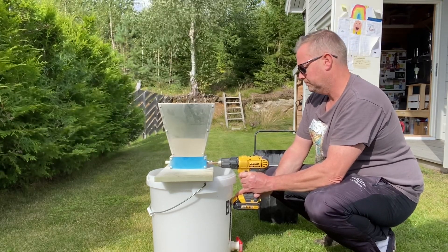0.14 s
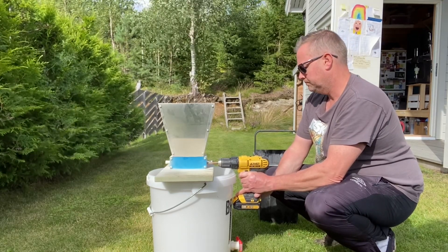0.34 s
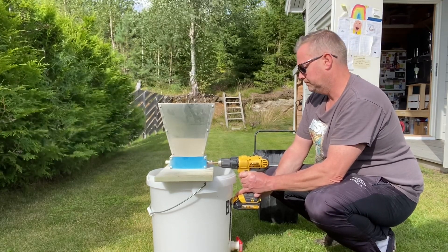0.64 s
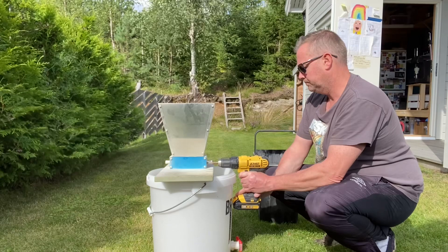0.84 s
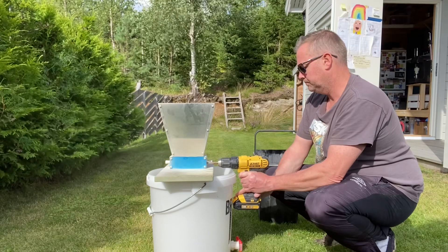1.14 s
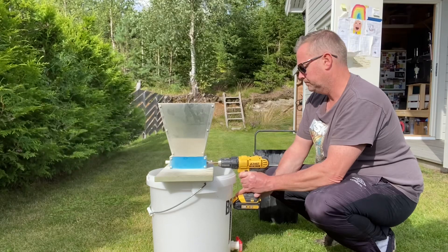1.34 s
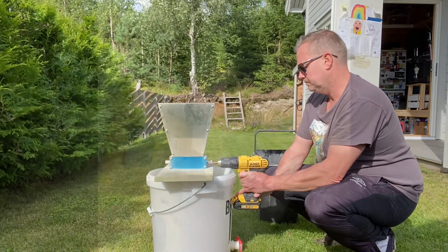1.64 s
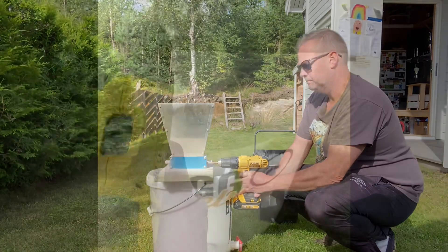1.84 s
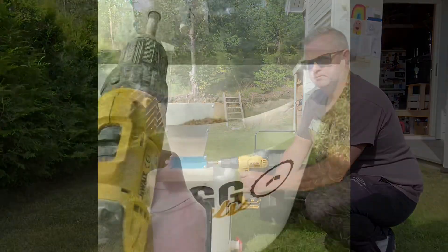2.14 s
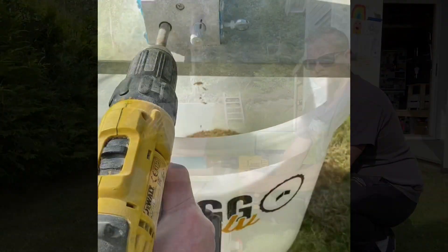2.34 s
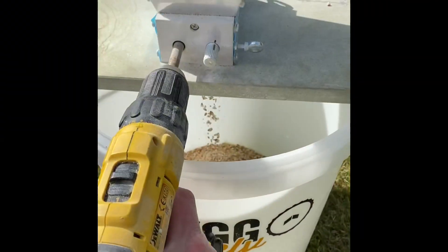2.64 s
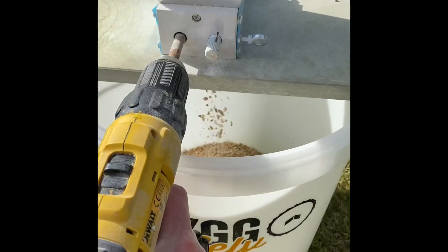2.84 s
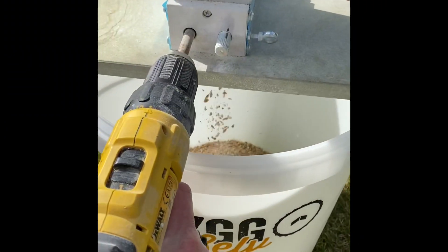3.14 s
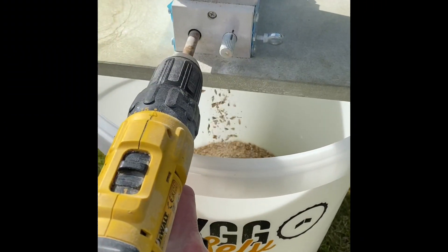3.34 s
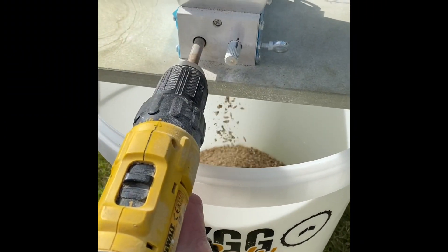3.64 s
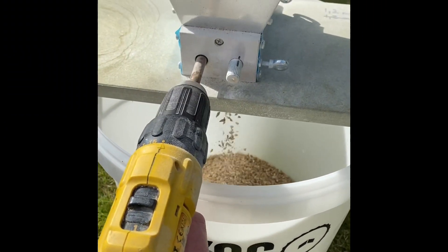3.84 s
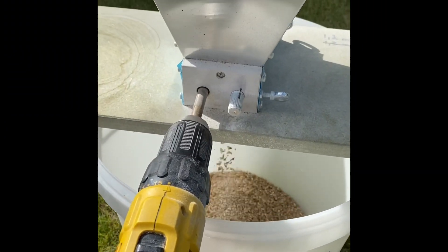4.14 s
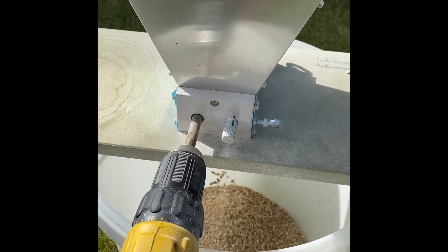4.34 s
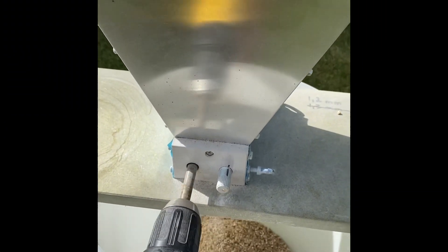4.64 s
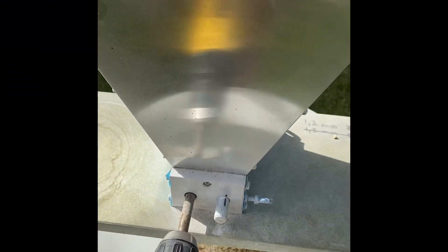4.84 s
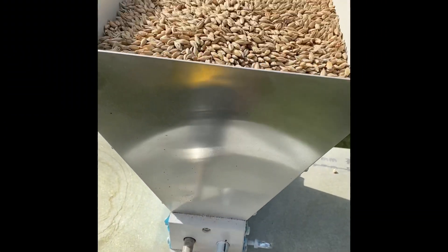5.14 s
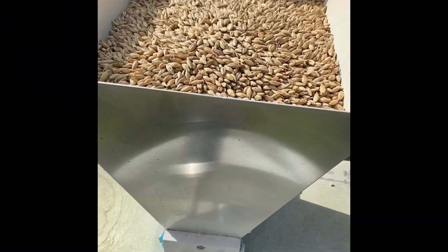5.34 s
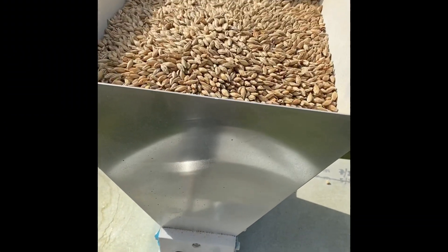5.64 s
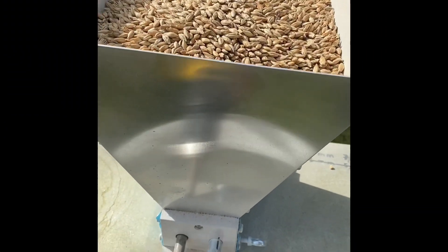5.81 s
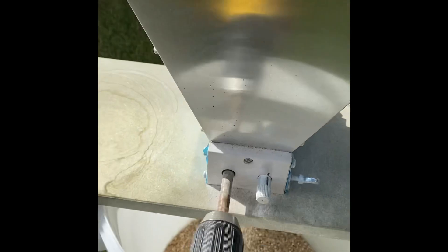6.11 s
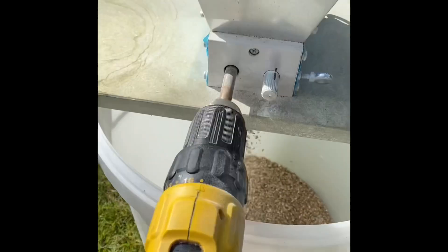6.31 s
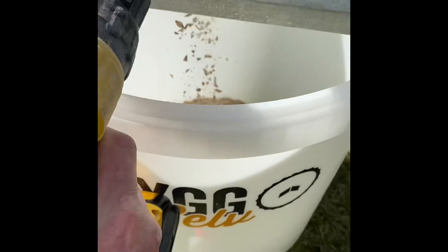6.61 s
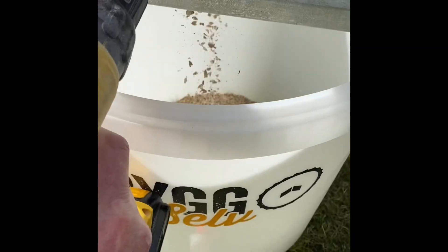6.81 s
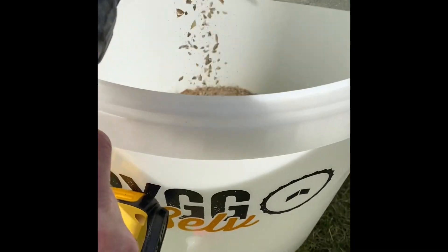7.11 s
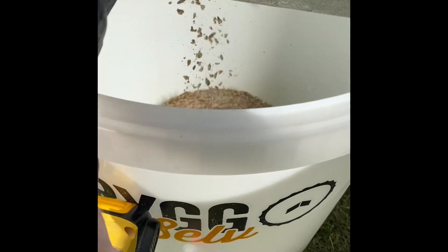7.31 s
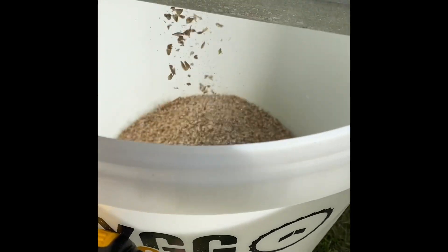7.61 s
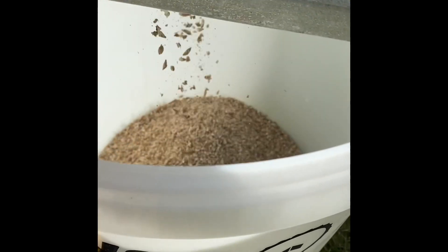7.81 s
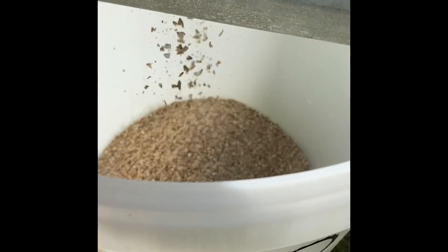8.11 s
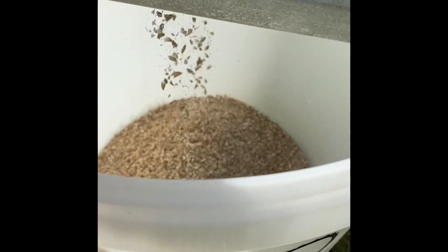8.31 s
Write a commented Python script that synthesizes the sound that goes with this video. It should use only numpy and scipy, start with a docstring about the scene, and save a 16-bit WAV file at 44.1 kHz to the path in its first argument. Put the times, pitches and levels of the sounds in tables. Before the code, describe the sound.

A cordless drill turns a grain mill outdoors, first distant under buffeting wind, then close and loud with piercing whine, gritty crunching and sagging gears.

```python
"""A cordless drill turns the rollers of a malt mill on a board over a plastic bucket, on a lawn.
At first the mill is heard from a few steps away as one ringing body, with gusts on the microphone.
A cross-fade leads to a close microphone: the rollers nudge the grain, falter, bite and get going.
The chopped motor current whines at a fixed pitch, gears sing and sag under clumps, kernels fracture into resonances.
The microphone moves from drill to board to hopper, with a soft thump on the way, then back down to the bucket."""
import sys
import numpy as np
from scipy import signal
from scipy.fft import rfft, irfft, next_fast_len
from scipy.io import wavfile
from scipy.ndimage import uniform_filter1d

SR = 44100
rng = np.random.default_rng(int(sys.argv[2]) if len(sys.argv) > 2 else 0)


def persist_wave(psi):
    """Save psi, clipped to +-1, as 16-bit WAV."""
    counts = np.round(np.clip(psi, -1, 1) * 32767).astype(np.int16)
    wavfile.write(sys.argv[1], SR, np.atleast_2d(counts).T)


N = 373086

# wind gusts: (start [s], length [s], rumble level [dB], flapping against the rumble [dB])
GUSTS = [(0, 1.4, -38.5, -21), (0.01, 0.18, -28, -2.5), (0.04, 0.015, -27, -6), (0.222, 0.023, -30.5, -22),
         (0.337, 0.032, -32.5, -16), (0.477, 0.042, -28, -4), (0.557, 0.066, -30, -5),
         (0.657, 0.016, -28.5, -3), (0.72, 0.036, -37, -18), (0.815, 0.02, -35, -13),
         (0.873, 0.062, -31, -24), (1.01, 0.093, -35.5, -25), (1.169, 0.03, -29.5, -14),
         (1.306, 0.064, -33.5, -7), (1.415, 0.14, -36.5, -9), (4.06, .25, -40, -13),
         (5.147, 0.72, -42.5, -25), (5.867, 0.49, -39.5, -23)]
# spectrum of the wind's rumble: (frequency [Hz], level [dB per Hz])
RUMBLE_SPECTRUM = [(15, -48), (35, -8), (60, 4), (110, 0), (200, -8), (350, -23.5), (700, -48.5),
                   (2000, -87.5)]
GUST_EDGE_S = 0.01
# floor under the gusts: the breeze fades with the distant view, the lull stays
BREEZE_DB, LULL_DB = -47, -51.5

# likeness of left and right: (frequency [Hz], likeness [0-1], lead of the left [rad]); from 8.2 to 11.6 kHz
# left and right are exact opposites
NEAR_PORTS = [(100, .92, 0), (400, .85, 0), (620, .8, -.9), (800, .8, -1.2), (1150, .75, 1.5),
              (1450, .85, .6), (1800, .85, .4), (2700, .8, 1.4), (3500, .85, .9), (4900, .8, 2.0),
              (5700, .8, 1.6), (7200, .9, 2.6), (8200, 1, 3.14), (11600, 1, 3.14), (14000, .65, 3.7)]
FAR_PORTS = [(200, .7, 0), (600, .88, 0), (1300, .97, -.2), (2000, .85, -.9), (3900, .8, -2.2),
             (6000, .7, -4), (7500, .97, -6.2), (10500, .95, -6.4), (14000, .7, -8.5)]
NEAR_LAG_MS = 0.05   # right port behind the left
# path of the close microphone: (time [s], place [0 hopper, 1 board, 2 drill, 3 bucket])
PATH = [(2.5, 2), (3.55, 1.94), (4.2, 1.41), (4.7, 0.53), (5.1, 0.047), (5.75, 0.043), (6.2, 1.22),
        (6.55, 2.18), (7.25, 3.12), (8.46, 3.17)]

# the distant view: crushing level, whine at left and right port, lead of the left whine, fade-out
FAR_DB, FAR_WHINE_DB, FAR_WHINE_LEAD_RAD = -33.5, (-37, -39.5), -2.08
FADE_START_S, FADE_END_S = 1.604, 2.53
# resonances of the distant mill as one body: (frequency [Hz], width [Hz], level [dB])
FAR_MODES = [(192, 91, -6.5), (475, 71, 3), (621, 22.6, 6), (683, 63, 0.5), (813, 66, 0.5),
             (1220, 405, -4.5), (1403, 43, 5), (1840, 235, -6), (2032, 13, 0.5), (2270, 120, -7.5)]
# hiss spectra of husks, far and near: (frequency [Hz], level [dB per Hz])
FAR_HUSKS_SPECTRUM = [(1500, -15), (2700, 0), (3500, -1), (4100, 4), (4400, -3), (5050, 4), (6500, -4),
                      (7400, 1), (8300, 2), (9500, -6), (11000, -9), (13000, -7), (14500, -5), (16000, -12)]
HUSKS_SPECTRUM = [(2500, -20), (3600, -5), (4300, 1), (5200, 1), (6100, -3.5), (7100, -1.5), (8600, -1),
                  (10000, -5), (12000, -7.5), (14700, -7), (16000, -19)]

# resonances of bucket walls, bucket air at the rim, board, hopper walls, hopper mouth and grist:
# (frequency [Hz], width [Hz], level [dB])
BUCKET_MODES = [(58.5, 36, -3.5), (96, 27, -0.5), (158.4, 22, 2.5), (288, 58, -2)]
BUCKET_AIR_MODES = [(86.5, 46, -4), (150, 15, 7.5), (430, 130, -12), (548, 57, 1)]
BOARD_MODES = [(384, 99, -12), (519, 38, -4), (627.4, 31.4, 4.5), (699.5, 53, -0.5), (799, 72, -3)]
HOPPER_MODES = [(1111, 280, 1), (1368, 250, 2.5), (1686, 387, -0.5), (2388, 300, 3), (2810, 570, -1),
                (3680, 450, -6.5)]
MOUTH_MODES = [(809, 160, 1.5), (1042, 37, -2.5), (1113, 101, 0.5), (1597, 160, -2.5)]
GRIST_MODES = [(8400, 1100, 0)]
# base level of each crushed part at four places: (hopper [dB], board [dB], drill [dB], bucket [dB])
BUCKET_DB = (-43.5, -42, -36.5, -40.5)
BUCKET_AIR_DB = (-47.5, -52, -48, -35)
BOARD_DB = (-34.5, -32.5, -32, -32)
HOPPER_DB = (-34, -35.5, -30, -29)
HUSKS_DB = (-37, -35.5, -32, -26.5)
GRIST_DB = (-63, -66, -61, -35.5)
# the board's two highest modes against the others, at the same places [dB]
BOARD_TOP_DB = (1, 0.95, 0.66, -2.5)
# the hopper's mouth against its walls, at the same places [dB]
MOUTH_DB = (-0.5, 1.5, -7, -32.5)
# basic left-right difference of board and hopper, at the same places [dB]
PAN_DB = (-2.5, -3.5, -3.5, -3)
# the rollers nudge the grain once, then bite and get going
NUDGE_AT_S, NUDGE_WIDTH_S, NUDGE_DB = 2.263, 0.086, -12.5
BITE_AT_S, BITE_RISE_S = 2.384, 0.17
LOAD_DB_PER_HZ = -0.012   # crushing grows softer as the drill sags
# hard kernels bursting: (time [s], peak before the ports [dB], low-pass corner [Hz], decay time [s])
SNAPS = [(2.225, -28, 2970, 0.016), (2.653, -24.5, 700, 0.009), (2.852, -25, 598, 0.0037),
         (2.999, -16.5, 8000, 0.0033), (3.021, -19, 5000, .002), (3.787, -18, 1000, .008),
         (3.822, -18, 2397, 0.0055), (3.925, -11.5, 12000, 0.0061), (4.534, -22.5, 800, 0.0044),
         (4.622, -25, 911, 0.015), (4.751, -22, 800, 0.0082), (5.236, -23.5, 704, 0.0078),
         (5.332, -17.5, 3000, 0.01), (5.567, -22.5, 2400, 0.006), (5.585, -22.5, 250, 0.0043),
         (6.258, -25, 600, 0.0031), (6.603, -9, 5970, 0.0033), (7.585, -17, 600, 0.0046),
         (7.865, -17.5, 600, .007)]

# close switching whine: (time [s], left base level [dB], right base level [dB], lead of the left [rad])
WHINE = [(2.062, -70, -70, 6), (2.075, -40, -31.5, 2.5), (2.21, -29.5, -27.5, 0.5), (2.34, -33.5, -30, 1),
         (2.47, -25.5, -23, 0.3), (2.75, -28.5, -22.5, 0), (3.57, -28, -20, 0.9), (3.9, -32.5, -26.5, -2),
         (4.27, -24.5, -33, -3.5), (4.62, -27, -25, -4), (5.05, -27, -22, -4), (5.5, -28.5, -30.5, -4.5),
         (6.03, -29.5, -26, -4.5), (6.19, -25, -28, -3), (6.39, -23, -17, -5), (6.62, -23.5, -25, -6),
         (6.98, -24, -22.5, -5.5), (7.13, -27, -26.5, -6), (7.8, -24.5, -29, -6), (8.46, -23.5, -25.5, -6)]
# nodes of the whine's standing waves that the microphone crosses:
# (time [s], half width [s], left loss [dB], right loss [dB])
NODES = [(3.73, 0.041, 8, 2.5), (4.109, 0.063, 9, 30), (4.84, 0.089, 3.5, 6), (6.08, 0.038, 9, 12),
         (6.3, 0.026, 11, 15), (6.35, 0.032, 17, -1)]

# drill speed apart from jams, with a faltering spin-up: (time [s], gear mesh rate [Hz])
CRUISE = [(0, 1364), (2.37, 1368), (2.4, 850), (2.515, 1085), (2.555, 1015), (2.62, 1147), (2.7, 1250),
          (2.74, 1345.0), (2.79, 1393), (3.3, 1520.0), (3.55, 1517), (3.8, 1444.0), (4.4, 1422),
          (4.58, 1323.0), (4.66, 1438), (4.8, 1466), (5.03, 1248), (5.38, 1460), (5.72, 1296),
          (5.93, 1450.0), (6.1, 1463), (6.25, 1362), (6.78, 1447.0), (7.05, 1414), (7.43, 1468),
          (7.59, 1367.0), (7.68, 1455), (8.04, 1494), (8.14, 1421), (8.46, 1392)]
# tough clumps: (end of slowing [s], sag of the mesh rate [Hz], slowing time [s], recovery time [s])
JAMS = [(3.03, 167.9, 0.047, 0.088), (3.115, 102.0, 0.037, 0.097), (3.35, 141.1, 0.043, 0.2),
        (3.62, 142.9, 0.088, 0.077), (3.82, 138.8, 0.14, 0.18), (4.05, 55.02, 0.096, 0.035),
        (4.19, 130.0, 0.064, 0.092), (4.73, 70.0, 0.036, 0.03), (4.87, 91.25, 0.057, 0.032),
        (5.25, 72.88, 0.053, 0.18), (5.46, 102.1, 0.089, 0.051), (5.98, 55.95, 0.032, 0.032),
        (6.14, 94.9, 0.042, 0.068), (6.575, 175.6, 0.051, 0.043), (6.82, 53.13, 0.021, 0.062),
        (7.05, 119.3, 0.044, 0.085), (7.31, 78.4, 0.026, 0.059), (7.465, 89.2, 0.029, 0.088),
        (7.71, 45.94, 0.027, 0.058), (7.91, 55.2, 0.043, 0.021), (8.35, 279.6, 0.031, 0.031)]
# mesh-rate slowing at which braking counts as full, and the rattle it adds to the third harmonic
HARD_BRAKE_HZ_PER_S, BRAKE_RATTLE_DB = 1200, 6.5
# resonances and hollows of the gear case: (frequency [Hz], half width [Hz], level [dB])
CASE = [(1110, 180, -11), (1430, 120, 6), (3670, 250, 2.5), (4023, 190, 7), (5700, 780, -8),
        (7100, 770, -4)]
# directional resonances of the case:
# (frequency [Hz], half width [Hz], hopper [dB], board [dB], drill [dB], bucket [dB])
BEAMS = [(2510, 44, 4, 4, 14.5, 1.5), (2885, 60, 4, 10.5, -1.5, 1.5)]
# base level of each gear partial at four places: (hopper [dB], board [dB], drill [dB], bucket [dB])
ROTOR_DB = (-48.5, -50.5, -48.5, -40.5)
MESH_DB = (-68.5, -43, -37, -39)
SECOND_DB = (-44, -49.5, -40, -32)
THIRD_DB = (-63, -53, -38, -38)
FOURTH_DB = (-61, -52.5, -38.5, -35)
FIFTH_DB = (-46, -39.5, -38.5, -39)
PLANET_SHARE = .08   # sidebands lie this share of the mesh rate below each partial
MESH_SIDEBAND_DB, HARMONIC_SIDEBAND_DB = -6.5, -12
FILLED_AT_S, EMPTY_PLAY = 2.95, .6   # gears run cleaner until the rollers have filled with grain
STALL_SAG_HZ, STALL_LOSS_DB = 220, 9   # close to a stall the gear tones weaken
CUTOFF_HZ = 15900


def from_db(db):
    """Logarithmic level law: decibels to amplitude gain."""
    return 10 ** (np.asarray(db) / 20)


def rms_one(x):
    """Normalisation to unit mean power."""
    return x / np.sqrt(np.mean(x ** 2) + 1e-20)


def clock():
    """Uniform sampling: time in seconds at every sample."""
    return np.arange(N) / SR


def bell(x, centre, width):
    """Gaussian hump of height 1, fallen to 1/e one width from its centre."""
    return np.exp(-np.minimum(((x - centre) / width) ** 2, 20))


def in_time(rows):
    """Linear interpolation of each column of a curve at every sample."""
    s, *columns = np.transpose(rows)
    return [np.interp(clock(), s, column) for column in columns]


def at_hz(points, hz):
    """Interpolation of a table on a logarithmic frequency axis."""
    f, value = np.transpose(points)
    return np.interp(np.log(hz + 1), np.log(f), value)


def filtered(x, response):
    """Linear filtering: the spectrum is multiplied by a response given against frequency."""
    size = next_fast_len(N + 4096)
    hz = np.arange(size // 2 + 1) * SR / size
    return irfft(rfft(x, size) * response(hz), size)[..., :N]


def coloured(x, spectrum):
    """Spectral shaping of a sound; rms 1."""
    return rms_one(filtered(x, lambda hz: from_db(at_hz(spectrum, hz))))


def drift(rate):
    """Low-passed random fluctuation of rms 1, slow below the given rate in Hz."""
    return rms_one(filtered(rng.standard_normal(N), lambda hz: 1 / (1 + (hz / rate) ** 2)))


def ring(x, modes):
    """Modal superposition: resonances in parallel, with alternating signs."""
    out = 0
    for k, (hz, width, db) in enumerate(modes):
        r = np.exp(-np.pi * width / SR)
        poles = [1, -2 * r * np.cos(2 * np.pi * hz / SR), r * r]
        mode = signal.lfilter([1, 0, -1], poles, x + 1e-18)
        out = out + (-1) ** k * from_db(db) * (1 - r * r) / 2 * mode
    return out


def band(x, low_hz, high_hz):
    """Band limitation; rms 1."""
    edges = [low_hz, min(high_hz, .45 * SR)]
    return rms_one(signal.sosfilt(signal.butter(2, edges, "band", fs=SR, output="sos"), x))


def panned(x, pan_db):
    """Intensity stereo: power shared between left and right."""
    gains = from_db(np.array([[.5], [-.5]]) * pan_db)
    return x * gains / np.sqrt(np.mean(gains ** 2, axis=0))


def ports(pair, table):
    """Partial coherence: two sounds become left and right, alike and shifted in phase by frequency."""
    likeness, lead = np.array(table)[:, [0, 1]], np.array(table)[:, [0, 2]]
    mid = filtered(pair[0], lambda hz: np.sqrt(1 + np.clip(at_hz(likeness, hz), -1, 1)))
    side = filtered(pair[1], lambda hz: np.sqrt(1 - np.clip(at_hz(likeness, hz), -1, 1)))
    right = filtered(mid - side, lambda hz: np.exp(-1j * at_hz(lead, hz)))
    return np.array([mid + side, right])


def heard(levels):
    """Dependence on position: a value given for each place, followed along the microphone's path."""
    place, = in_time(PATH)
    return np.interp(place, np.arange(len(levels)), levels)


def far_fade():
    """Linear amplitude fade-out of the distant view."""
    return np.clip((FADE_END_S - clock()) / (FADE_END_S - FADE_START_S), 0, 1)


def biting():
    """Exponential approach to full level as the close rollers bite and get going."""
    return 1 - np.exp(-np.maximum(clock() - BITE_AT_S, 0) / BITE_RISE_S)


def running():
    """Envelope of the close crushing: a Gaussian nudge, then the steady run."""
    return from_db(NUDGE_DB) * bell(clock(), NUDGE_AT_S, NUDGE_WIDTH_S) + biting()


def sag():
    """Load on a motor: each clump costs mesh rate (Hz) quickly, then speed recovers exponentially."""
    t = clock()[::20]
    lost = 0
    for s, hz, slowing_s, recovery_s in JAMS:
        slowing = np.clip(1 + (t - s) / slowing_s, 0, 1)
        recovery = np.exp(-np.clip((t - s) / recovery_s, 0, 20))
        lost = lost + hz * slowing * recovery
    return np.interp(clock(), t, lost)


def braking():
    """Deceleration: how hard a clump is slowing the drill, 0-1, smoothed over 20 ms."""
    slowing = np.gradient(sag()) * SR / HARD_BRAKE_HZ_PER_S
    return uniform_filter1d(np.clip(slowing, 0, 1), size=SR // 50)


def breeze(own=0.85, lumpy_db=1.0):
    """Turbulent pressure: gusts rumble partly alike on both ports and flap higher up on each apart."""
    t = clock()
    gusts = []
    for s, length_s, db, _ in GUSTS:
        inside_s = np.minimum(t - s, s + length_s - t)   # negative outside the gust
        gusts.append(from_db(db) * np.clip(1 + inside_s / GUST_EDGE_S, 0, 1))
    floor = from_db(BREEZE_DB) * far_fade() + from_db(LULL_DB)
    level = np.maximum(np.max(gusts, axis=0), floor)
    flaps = [gust * from_db(flap_db) for gust, (*_, flap_db) in zip(gusts, GUSTS)]
    eddies = rng.standard_normal(N) + own * rng.standard_normal((2, N))
    rumble = coloured(eddies * from_db(lumpy_db * drift(17)), RUMBLE_SPECTRUM)
    flapping = band(rng.standard_normal((2, N)), 150, 377)
    return level * rumble + np.max(flaps, axis=0) * flapping


def bump(at_s=4.092, peak_db=-17, push_s=0.011):
    """Impulse response: a short handling push on the microphone excites three bass resonances."""
    since = clock() - at_s
    push = np.clip(since / 0.0044, 0, 1) * np.exp(-np.maximum(since, 0) / push_s)
    modes = [(64.0, 22.0, -3.0), (111, 61, 4.0), (176, 61, 5.5)]   # Hz, width Hz, dB
    thud = ring(push * (1 + 0.045 * drift(200)), modes)
    return from_db(peak_db) * thud / np.abs(thud).max()


def cracks(per_s, spread_db, clump_db):
    """Random impulses: two trains of kernel fractures of uneven size, swelling in common clumps."""
    born = rng.random((2, N)) < per_s / SR
    size_db = spread_db * np.minimum(rng.exponential(1, (2, N)), 4)
    sizes = from_db(size_db) * rng.choice([-1, 1], (2, N))
    return rms_one(born * sizes * from_db(clump_db * drift(18.6)))


def mill_far(husk_db=-10):
    """Forced modal vibration: fractures ring the distant mill as one body, under a hiss of husks."""
    crush = ports(cracks(per_s=3500, spread_db=3.5, clump_db=1.5), FAR_PORTS)
    body = band(ring(crush, FAR_MODES), 110, 7200)
    rustle = ports(rng.standard_normal((2, N)), FAR_PORTS)
    husks = coloured(rustle + .5 * crush, FAR_HUSKS_SPECTRUM)
    return far_fade() * from_db(FAR_DB) * (body + from_db(husk_db) * husks)


def mill_near(uneven_db=0.1):
    """Forced modal vibration: coarse and fine fractures ring board, hopper and bucket; husks and grist hiss."""
    pan_db = heard(PAN_DB)
    coarse = ports(cracks(per_s=1000, spread_db=2.0, clump_db=1.75), NEAR_PORTS)
    fine = ports(cracks(per_s=9000, spread_db=2.5, clump_db=2.0), NEAR_PORTS)
    shreds = ports(cracks(per_s=20000, spread_db=5.0, clump_db=2.5), NEAR_PORTS)

    bucket = from_db(heard(BUCKET_DB)) * band(ring(fine, BUCKET_MODES), 28, 340)
    bucket_air = from_db(heard(BUCKET_AIR_DB)) * band(ring(shreds, BUCKET_AIR_MODES), 50, 700)

    # the minus keeps the signs of the modes alternating
    plank = ring(coarse, BOARD_MODES[:3]) - from_db(heard(BOARD_TOP_DB)) * ring(coarse, BOARD_MODES[3:])
    board = from_db(heard(BOARD_DB) + uneven_db * drift(3.8)) * band(plank, 383, 1200)

    walls = band(ring(fine + .5 * coarse, HOPPER_MODES), 1080, 3800)
    mouth = from_db(heard(MOUTH_DB)) * band(ring(coarse, MOUTH_MODES), 720, 2500)
    hopper = from_db(heard(HOPPER_DB)) * (panned(walls, .5 * pan_db) + panned(mouth, 6.1 * pan_db))

    husks = from_db(heard(HUSKS_DB)) * coloured(shreds + 0.5 * coarse, HUSKS_SPECTRUM)
    grist = from_db(heard(GRIST_DB)) * rms_one(ring(fine, GRIST_MODES))
    crushing = bucket + bucket_air + panned(board, 2.7 * pan_db) + hopper + husks + grist
    return running() * from_db(LOAD_DB_PER_HZ * sag()) * crushing


def snaps(splinter_db=5.5, bare=0.55):
    """Brittle fracture: a hard kernel bursts into decaying uneven splinters that knock board and hopper."""
    out, t = np.zeros((2, N)), np.arange(SR // 10) / SR
    for s, peak_db, top_hz, burst_s in SNAPS:
        splinters = from_db(splinter_db * rng.standard_normal(len(t)))
        burst = rng.standard_normal((2, len(t))) * splinters * np.exp(-t / burst_s)
        low_pass = signal.butter(1, min(top_hz, .45 * SR), fs=SR, output="sos")
        knock = signal.sosfilt(low_pass, ring(burst, BOARD_MODES + HOPPER_MODES) + bare * burst)
        at = round(s * SR)
        out[:, at:at + len(t)] += (from_db(peak_db) * knock / np.abs(knock).max())[:, :N - at]
    return ports(out, NEAR_PORTS)


def switching_whine(flutter_db=1.0, wobble=0.086, octave_db=-30, waver_db=0.5):
    """Electromagnetic force: the speed control chops the current at a fixed rate and the windings sing."""
    t, side = clock(), np.array([[.5], [-.5]])
    left_db, right_db, lead = in_time(WHINE)
    loss_db = 0
    for s, width_s, left, right in NODES:
        loss_db = loss_db + np.array([[left], [right]]) * bell(t, s, width_s)
    # complex amplitudes at the two ports
    near = from_db(np.array([left_db, right_db]) - loss_db) * np.exp(1j * side * lead)
    far = far_fade() * from_db(FAR_WHINE_DB)[:, None] * np.exp(1j * side * FAR_WHINE_LEAD_RAD)
    unsteady = []
    for _ in side:
        flutter = from_db(flutter_db * drift(84) + waver_db * drift(15))
        unsteady.append(flutter * np.exp(1j * wobble * drift(90)))
    chop_hz = 3911.9
    phase = 2 * np.pi * chop_hz * t
    tone = np.imag((near + far) * np.array(unsteady) * np.exp(1j * phase))
    lag = 2 * np.pi * chop_hz * NEAR_LAG_MS / 1000 * np.array([[0], [1]])
    octave_level = from_db(octave_db) * np.abs(near + far).mean(axis=0)
    octave = octave_level * np.sin(2 * (phase - lag) + .4 * drift(40))
    return np.sqrt(2) * (tone + octave)   # levels are rms


def gears(swell_db=0.8, jolt=0.005, far_mesh_db=-49, far_third_db=-58):
    """Tooth meshing at ten times the rotor rate: harmonics of a jittering speed, planets' lower sidebands."""
    cruise_hz, = in_time(CRUISE)
    sag_hz, near, far = sag(), biting(), far_fade()
    mesh_hz = cruise_hz - sag_hz
    phase = 2 * np.pi * np.cumsum(mesh_hz * (1 + jolt * drift(30.36))) / SR
    tables = (ROTOR_DB, MESH_DB, SECOND_DB, THIRD_DB, FOURTH_DB, FIFTH_DB)
    rotor, mesh, second, third, fourth, fifth = (near * from_db(heard(db)) for db in tables)
    mesh = mesh + far * from_db(far_mesh_db)
    third = third * from_db(BRAKE_RATTLE_DB * braking()) + far * from_db(far_third_db)
    play = np.maximum(far, np.where(clock() > FILLED_AT_S, 1, EMPTY_PLAY))
    stall_db = -STALL_LOSS_DB * np.clip(sag_hz / STALL_SAG_HZ, 0, 1) ** 2

    # tooth play smears the partials:
    # (multiple of the mesh rate, gain, left-right [dB], smear at full play [rad], flutter [dB])
    partials = [(1 / 10, rotor, -1, .2, 1.5),
                (1, mesh, -5, .1, 1.3),
                (2, second, -1, .25, 3.3),
                (3, third, -4, 1.05, 5),
                (4, fourth, -2, 1.1, 3.5),
                (5, play * fifth, 0, 2, 4)]
    out = 0
    for multiple, level, pan_db, smear, flutter_db in partials:
        partial_hz = multiple * mesh_hz
        lag = 2 * np.pi * partial_hz * NEAR_LAG_MS / 1000 * np.array([[0], [1]])
        turn = multiple * phase + play * smear * drift(110) - lag
        tone = np.sin(turn) * from_db(flutter_db * np.minimum(drift(22), 1.5))
        if multiple >= 1:
            sideband_db = MESH_SIDEBAND_DB if multiple == 1 else HARMONIC_SIDEBAND_DB
            sideband = np.sin(turn - PLANET_SHARE * phase + smear * drift(42))
            tone = tone + from_db(sideband_db) * sideband * from_db(flutter_db * drift(22))
        # the case lifts or dims each partial that passes through a resonance or hollow
        case_db = sum(db * bell(partial_hz, hz, width) for hz, width, db in CASE)
        beam_db = sum(heard(db) * bell(partial_hz, hz, width) for hz, width, *db in BEAMS)
        gain = from_db(case_db + beam_db + stall_db + swell_db * drift(5.5))
        out = out + level * gain * panned(rms_one(tone), pan_db)
    return out


def scene():
    """Superposition of breeze, handling thump, mill and drill in the open air."""
    mill = mill_far() + mill_near() + snaps()
    drill = switching_whine() + gears()
    return breeze() + bump() + mill + drill


def record(dry):
    """Band limitation: a steep elliptic low-pass cuts the top."""
    return signal.sosfilt(signal.ellip(10, .1, 80, CUTOFF_HZ, fs=SR, output="sos"), dry)


dry = scene()
out = record(dry)
persist_wave(out)
```